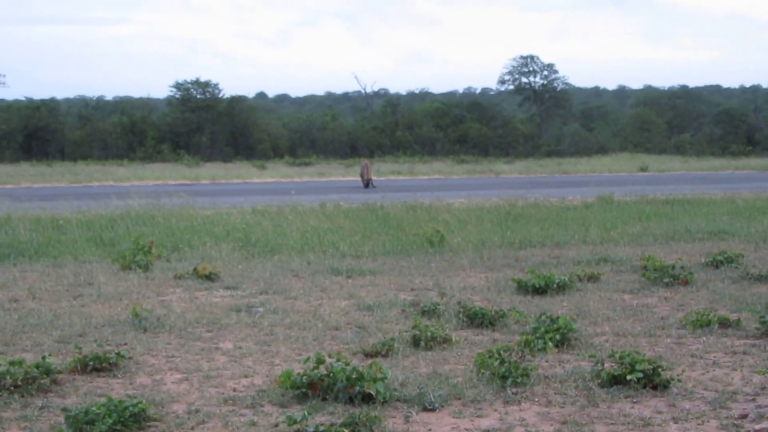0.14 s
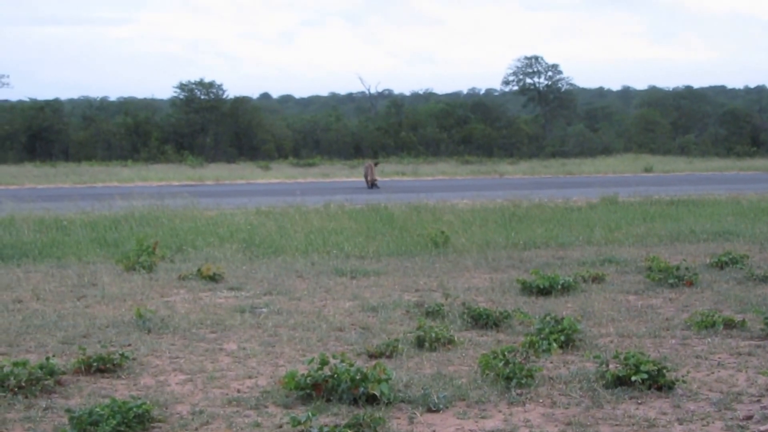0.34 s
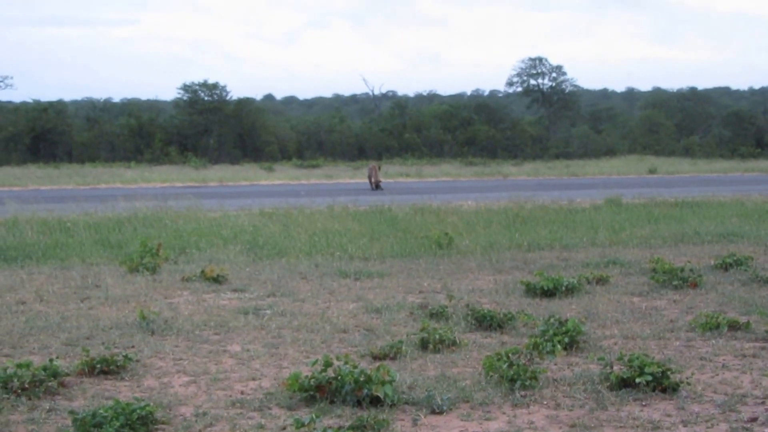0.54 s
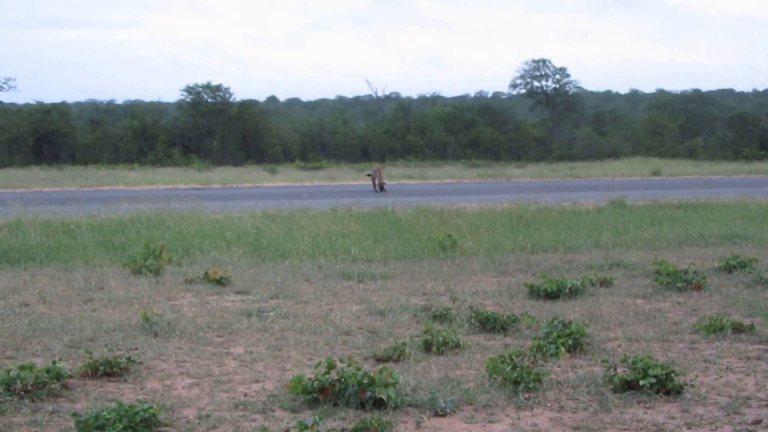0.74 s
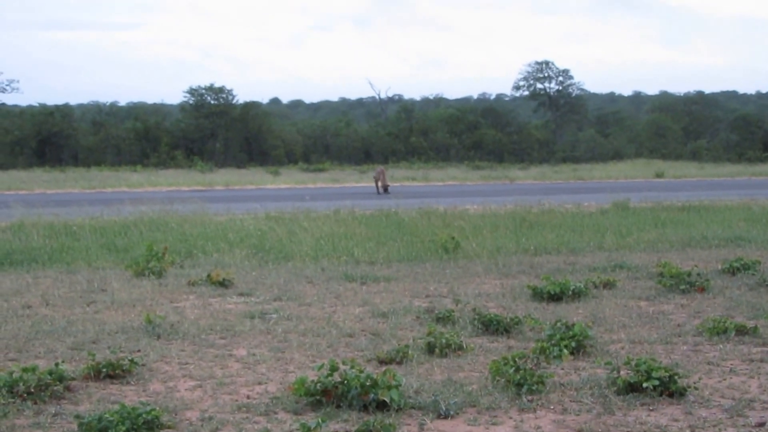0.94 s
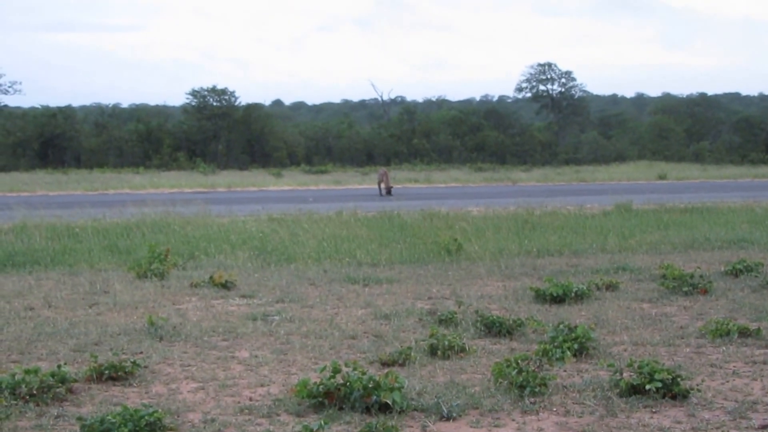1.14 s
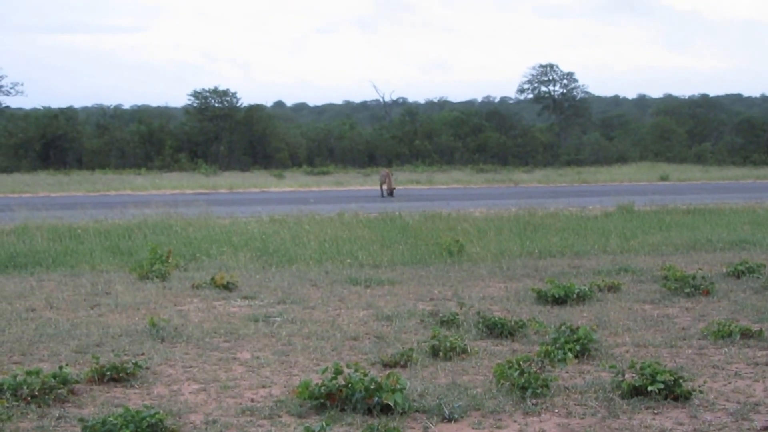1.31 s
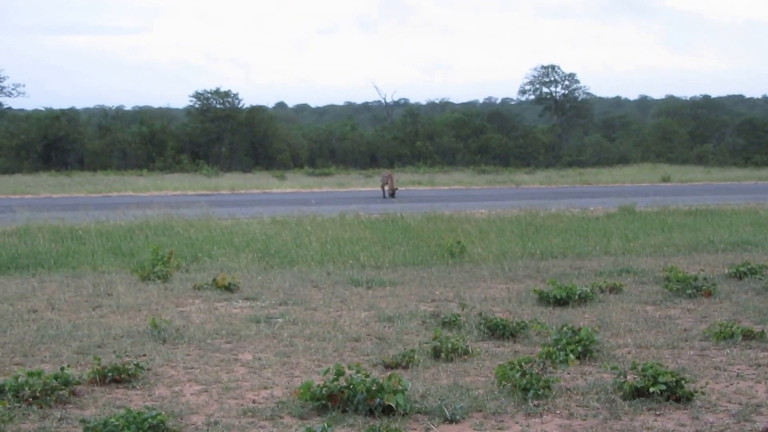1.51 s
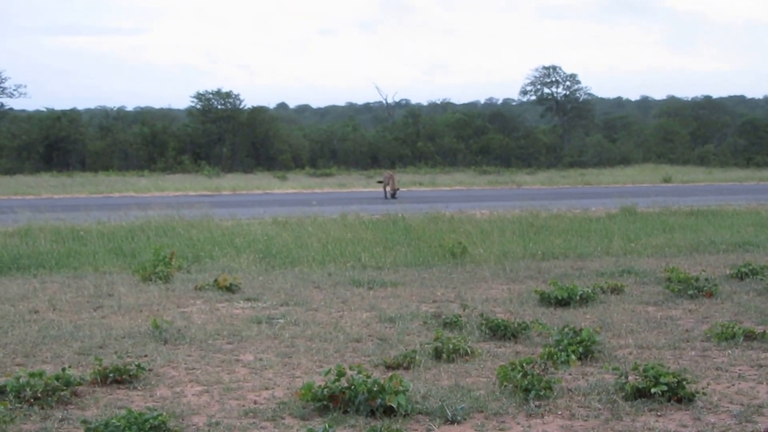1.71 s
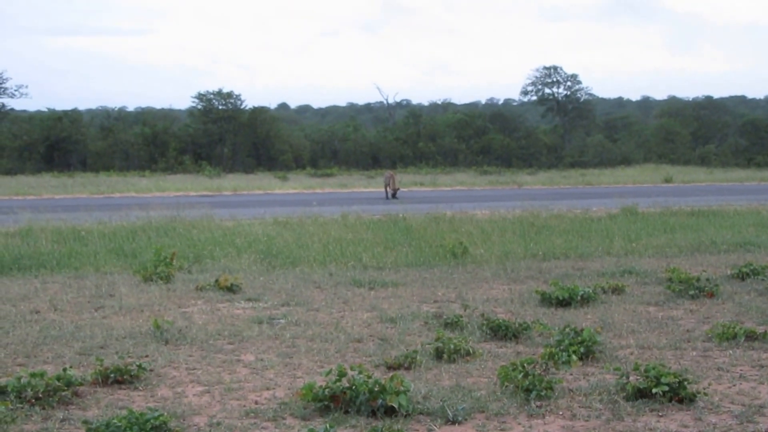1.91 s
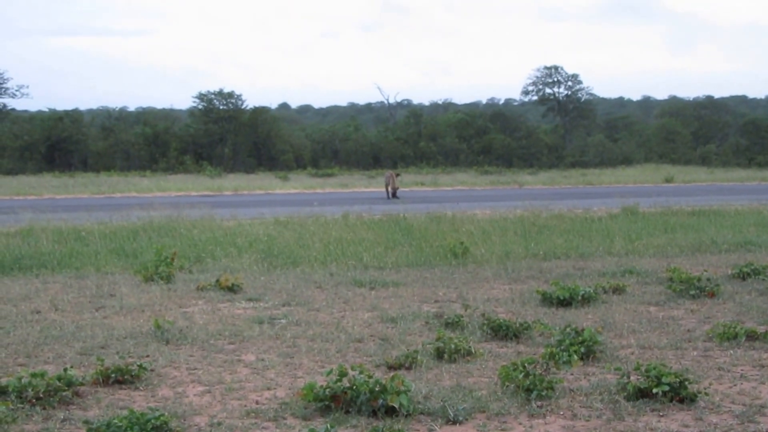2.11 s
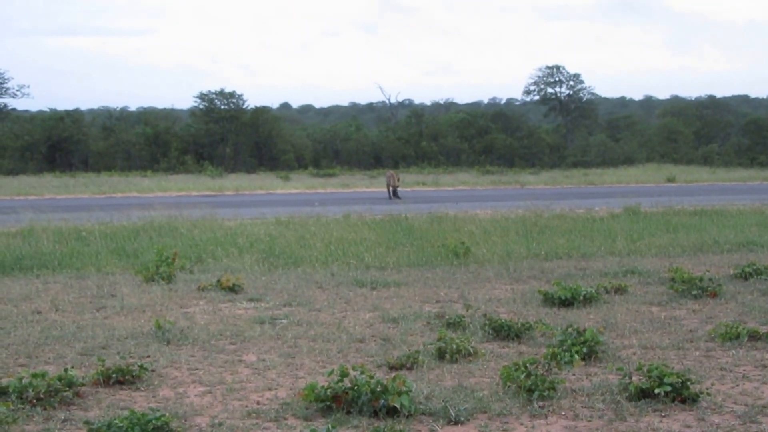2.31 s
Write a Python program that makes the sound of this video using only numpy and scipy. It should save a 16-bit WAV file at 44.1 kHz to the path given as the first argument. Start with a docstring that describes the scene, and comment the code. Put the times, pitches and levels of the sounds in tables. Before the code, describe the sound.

A single hyena whoop over open grassland: a smooth low moan rises, flips to a loud high arch, then drops roughly and fades; faint crickets and tiny bird notes, soft tree echo, clear mono pickup.

```python
"""A hyena whoops across open grassland: a clean moan glides up, breaks into a high arch and sinks back.
Overtones of one pitch and gated breath noise pass through resonances; a second, slower vibration of the
vocal folds adds sidebands that roughen parts of the call. Crickets chirp and a bird trills and peeps as
short drooping sines. Shaped noise makes a faint outdoor hush with one low throb, and the tree line
answers the calls as a decaying scatter of echoes."""
import sys
import numpy as np
from scipy import signal
from scipy.fft import rfft, irfft, next_fast_len
from scipy.io import wavfile
from scipy.ndimage import uniform_filter1d, map_coordinates

SR = 44100
rng = np.random.default_rng(int(sys.argv[2]) if len(sys.argv) > 2 else 0)


def file_out(sig):
    """Save sig as 16-bit WAV at sys.argv[1]."""
    # one column per channel
    cols = np.atleast_2d(sig).T
    # limit, then scale
    lim = np.clip(cols, -1, 1)
    pcm = np.round(lim * 32767).astype(np.int16)
    wavfile.write(sys.argv[1], SR, pcm)


N = 103635  # length in samples
TOP_HZ = 15100  # upper band limit

# Treble resonances that colour both overtones and breath: center_hz, width_hz, gain_db
TREBLE_RESONANCES = [(4190, 170, -1), (4728, 170, -5), (5250, 300, -7), (5660, 250, -3),
                     (7030, 1500, -14.5), (7950, 230, -11.5), (8600, 290, -14), (9600, 500, -21),
                     (10400, 920, -20), (11400, 790, -23.5)]


def hyena():
    """Source and filter: a periodic voice and pulsed breath noise, coloured by resonances."""
    # The call: time_s, pitch_hz, level_db of harmonics 1, 2, 3 and 4,
    # upper_db (harmonics from 5 up, before lift and resonances), breath_db (low breath)
    call = [(0.0, 255, -28, -22, -38, -49, -49, -39), (0.01, 243.4, -28, -37, -35.5, -49, -59.5, -50),
            (0.18, 256.8, -24.5, -37.5, -34, -45.5, -54, -51),
            (0.35, 281.5, -21.5, -44.5, -31.5, -42, -52, -45.5),
            (0.46, 301, -20, -35, -29, -39, -53.5, -43.5), (0.5, 308.4, -18.5, -30, -26.5, -49, -45.5, -36),
            (0.56, 345.4, -13, -21, -30, -26.5, -45.5, -37.5),
            (0.62, 379.3, -8.5, -23, -25.5, -38.5, -36, -42), (0.69, 399.8, -8, -25, -35.5, -34, -42, -46),
            (0.8, 432.5, -18, -25, -19, -31.5, -31, -44), (0.83, 446.6, -15, -25.5, -13, -22, -25, -44),
            (0.86, 464.7, -9.5, -25.5, -17, -25.5, -31.5, -41.5),
            (0.88, 536.6, -27, -15, -48, -52.5, -45.5, -48.5),
            (0.9, 580.6, -29.5, -21.5, -44, -32, -37, -48), (0.95, 661.5, -23, -11.5, -39, -42.5, -38, -49),
            (0.98, 734, -16, -12, -54, -50, -47.5, -49.5),
            (1.01, 769.6, -17.5, -11.5, -55.5, -50, -45, -51), (1.08, 818, -19, -16.5, -35, -51, -31, -52),
            (1.13, 796.7, -16.5, -12.5, -25.5, -42, -22.5, -48),
            (1.18, 714.3, -14, -18, -36, -65, -25, -50), (1.22, 660, -21, -15, -23.5, -37.5, -18, -46),
            (1.23, 636, -17.5, -17.5, -35.5, -41.5, -28.5, -54.5),
            (1.27, 571, -24, -24.5, -28.5, -32, -31, -52), (1.32, 469.8, -7, -25.5, -29, -27, -29, -39.5),
            (1.41, 434.6, -21, -28.5, -22.5, -30, -39.5, -43),
            (1.48, 408.7, -14, -22.5, -44, -48.5, -45, -40.5),
            (1.54, 386.4, -12.5, -24.5, -30, -43, -41, -43.5),
            (1.58, 349.8, -19, -25, -50, -39.5, -50, -35.5), (1.62, 321.7, -20, -36.5, -53, -61, -59, -36),
            (1.66, 280.0, -27.5, -46, -30.5, -38, -56, -34.5),
            (1.72, 272, -32, -49, -32, -70.5, -49.5, -37), (1.73, 266.4, -29, -38, -30, -38.5, -53, -40.5),
            (1.81, 261.4, -28, -40, -37.5, -49.5, -59, -43),
            (1.96, 248.8, -31, -42.5, -36, -45.5, -67.5, -49.5),
            (2.28, 234, -37, -41, -41.5, -48, -73, -60), (2.35, 232.5, -45, -54, -62, -62, -83, -55)]
    # Treble: time_s, overtone_db (before resonances and tilt), breath_db, hoarseness (pitch scatter, fraction)
    treble = [(0, -85, -77, .001), (.55, -79, -75, 0.0011), (.62, -72.5, -66.5, 0.0023),
              (.84, -65.5, -64.5, .002), (.88, -58, -63.5, 0.0025), (.93, -55, -62, .003),
              (.97, -48.5, -65, .002), (1.02, -52, -69.5, 0.00089), (1.09, -38, -69.5, .001),
              (1.14, -39, -62, 0.0034), (1.2, -41, -47.5, .012), (1.26, -49, -50.5, .02),
              (1.32, -56.5, -56, .02), (1.36, -63.5, -59.5, .01), (1.53, -68.5, -56.5, 0.0082),
              (1.62, -76, -71.5, 0.0024), (1.8, -89, -67, .002), (2.35, -93, -68, 0.0016)]
    glide_s = 0.024  # moving average that rounds every turn of the voice
    jitter, shimmer_db = 0.0016, 0.43  # random pitch (fraction) and level

    smooth_call = uniform_filter1d(curves(call), int(glide_s * SR), axis=1)
    pitch, *low_db, upper_db, breath_db = smooth_call
    bright_db, treble_breath_db, hoarse = curves(treble)
    pitch = pitch * (1 + jitter * wobble(59.63))
    turn = phase(pitch)

    overtones = upper_overtones(pitch, turn, upper_db, bright_db, hoarse)
    for k, db in enumerate(low_db[1:], 2):
        overtones += amp(db) * np.sin(k * turn + k * k / 3)
    fundamental = amp(low_db[0]) * np.sin(turn)
    voice = fundamental + flutter() * overtones + second_vibration(pitch, turn)
    voice *= np.sqrt(2)  # a lone sine then has its level as rms

    low_breath, treble_breath = breath(turn)
    shimmer = amp(shimmer_db * wobble(48.14))
    return shimmer * voice + amp(breath_db) * low_breath + amp(treble_breath_db) * treble_breath


def upper_overtones(pitch, turn, upper_db, bright_db, hoarse):
    """Harmonic series from the fifth up: throat resonances below, hoarse treble resonances above."""
    treble_from_hz = 3720
    lift_db, upper_slope_db, bright_slope_db = 20, 1, -5  # slopes per octave
    scatter_db, scatter_rate = 4.5, 51  # each treble overtone wavers on its own; knots per second
    total = np.zeros(N)
    for k in range(5, 30):
        hz = k * pitch
        high = 1 / (1 + np.exp((treble_from_hz - hz) / 60))  # crossfade to the treble
        throaty = amp(upper_db + lift_db) * throat(hz)
        throaty *= slope(upper_slope_db, hz, treble_from_hz / 2)
        bright = amp(bright_db + scatter_db * wobble(scatter_rate))
        bright *= peaks(TREBLE_RESONANCES, hz) * slope(bright_slope_db, hz, treble_from_hz)
        gain = (1 - high) * throaty + high * bright
        blur = phase(hz * hoarse * wobble(250))  # hoarseness as frequency modulation
        total += gain * (hz < TOP_HZ) * np.sin(k * turn + blur + k * k / 3)
    return total


def second_vibration(pitch, turn):
    """Biphonation: a second fold frequency makes sum and difference tones around each harmonic."""
    # time_s, ratio (rate over pitch), level_db of the sidebands,
    # rising_db (sum tones relative to difference tones)
    second_rows = [(0, 0.44, -50, -1), (.15, .45, -69, 4), (.35, 0.43, -44.5, -8), (.53, 0.49, -31, -9.5),
                   (.6, 0.44, -39, -7.5), (.84, 0.45, -35.5, -0.5), (.88, .43, -68, -7),
                   (1.29, .43, -76, -12.5), (1.33, 0.43, -23.5, -8.5), (1.45, 0.43, -31, -3.5),
                   (1.56, 0.39, -34, -10.5), (1.6, .47, -28, 1), (1.64, 0.56, -32, -24),
                   (1.67, .499, -31.5, -23), (1.73, .499, -28.5, -27.5), (1.79, .499, -36, -38),
                   (1.83, 0.52, -55, -30), (1.95, .499, -69, -16), (2.35, .499, -87, -18)]
    wander = 0.0042  # random drift of the ratio
    side_slope_db = 1  # per doubling of k + 1
    rasp_db, rasp_rate = 4, 70.25  # each sideband wavers on its own; knots per second

    ratio, side_db, rising_db = curves(second_rows)
    unlocked = (10 * np.abs(1 - 2 * ratio)).clip(0, 1)  # no rasp while the ratio is one half
    second = pitch * (ratio + wander * wobble(40))
    second_turn = phase(second)
    sides = np.zeros(N)
    for k in range(11):
        for j in (-1, 1):
            if k == 0 and j == -1:  # a negative frequency
                continue
            rasp = rasp_db * unlocked * wobble(rasp_rate)
            db = rising_db * (j > 0) + side_slope_db * np.log2(k + 1) + rasp
            gain = throat(k * pitch + j * second) * amp(db)
            sides += gain * np.sin(k * turn + j * second_turn + k * k / 3)
    return amp(side_db) * sides


def flutter():
    """Amplitude modulation of the overtones for a moment, as the arch falls."""
    center_s, half_s, rate_hz, depth = 1.197, 0.036, 88.4, 0.54
    t = np.arange(N) / SR
    beat = np.sin(2 * np.pi * rate_hz * t + 2.9 * wobble(35))
    return 1 + depth * np.exp(-((t - center_s) / half_s) ** 4) * beat


def breath(turn):
    """Turbulence noise pulsed once per pitch cycle, low through the throat and high in the treble."""
    slope_db = 2  # per octave

    def low_response(hz):
        low_cut = 1 / (1 + (250 / (hz + 1)) ** 4)
        return throat(hz) * slope(slope_db, hz, 700) * low_cut

    gated = rng.standard_normal((2, N)) * (1 + 0.32 * np.cos(turn))
    low = unit(filtered(gated[0], low_response))
    high = unit(filtered(gated[1], lambda hz: peaks(TREBLE_RESONANCES, hz)))
    return low, high


def throat(hz):
    """Transfer function of the vocal tract: resonances multiplied by a cancellation."""
    # Resonances of the throat: center_hz, width_hz, gain_db
    resonances = [(401.5, 83, 8.5), (778, 274, -4.5), (1010, 520, -15), (1350, 173, -4.5), (1696, 290, -18),
                  (1970, 180, -20.5), (2256, 250, -26.5), (3296, 120, -44)]
    # Cancellations: center_hz, half_width_hz (Gaussian, to 1/e), gain_db
    cancellations = [(3820, 380, -12)]
    grid = np.arange(1., SR, 4)
    dip_db = sum(db * np.exp(-((grid - c) / w) ** 2) for c, w, db in cancellations)
    return np.interp(hz, grid, peaks(resonances, grid) * amp(dip_db))


def crickets():
    """Pulsed tones: short drooping sines, mostly in groups of three."""
    # Pulses: time_s (each starts 3 ms earlier), peak_db
    pulses = [(0.0767, -56), (0.1084, -61), (0.1401, -56), (0.3965, -55), (0.4279, -53), (0.4594, -54),
              (0.6828, -52), (0.7148, -53), (0.7497, -52), (1.4616, -55), (1.4914, -55), (1.5259, -54),
              (1.737, -57), (1.7679, -58), (1.7993, -54), (2.0213, -58), (2.0532, -59), (2.0847, -59),
              (2.2932, -54), (2.3246, -56)]
    start_hz, length_s, fall_hz = 5350, .018, 500
    out = np.zeros(N + SR)
    for s, db in pulses:
        add_note(out, s - .003, db, start_hz, length_s, fall_hz)
    return out[:N]


def bird():
    """Frequency-swept notes: a trill of ten scattered note pairs, and two peeps."""
    # Peeps: start_s, peak_db, start_pitch_hz, length_s
    peeps = [(2.132, -51, 2296, .018), (2.308, -54, 1991, 0.027)]
    trill_from_s, step_s, note_s = 1.762, .0192, .015
    trill_hz, twin_below_hz, fall_hz = 5000, 326.8, 500  # each note has a lower twin
    trill_db = -58.5
    out = np.zeros(N + SR)
    for k, (db_draw, hz_draw) in enumerate(rng.standard_normal((20, 2))):
        start_s = trill_from_s + k // 2 * step_s
        hz = trill_hz - k % 2 * twin_below_hz + 90 * hz_draw
        add_note(out, start_s, trill_db + 1.6 * db_draw, hz, note_s, fall_hz)
    for s, db, hz, length_s in peeps:
        add_note(out, s, db, hz, length_s, 30)
    return out[:N]


def add_note(out, s, db, hz, length_s, fall_hz):
    """Phase is the integral of frequency: a soft sine whose pitch droops towards its end."""
    u = np.arange(int(length_s * SR)) / (length_s * SR)
    swell = np.sin(np.pi * u ** .8)
    note = amp(db) * swell * np.sin(phase(hz - fall_hz * u ** 2.5))
    out[round(s * SR):][:len(u)] += note


def trees(x):
    """Diffuse reverberation: convolution with noise whose every frequency dies at its own speed."""
    # Decay of the answer: frequency_hz, t60_s
    decay = [(200, 0.25), (1500, 0.94), (6000, 0.51)]
    delay_s = .02
    hz, t, z = signal.stft(rng.standard_normal(SR // 2), SR, nperseg=256)
    fade = amp(-60 * t / along(decay, hz)[:, None])
    tail = signal.istft(z * fade, SR, nperseg=256)[1]
    delayed = np.pad(x, (int(delay_s * SR), 0))
    return signal.fftconvolve(delayed, tail / np.linalg.norm(tail))[:N]


def air():
    """Filtered random noise: a hush that drifts a little, and a low throb under the call."""
    # Spectrum of the hush: frequency_hz, relative_db (per Hz)
    hush_spectrum = [(20, -1), (60, 0), (110, 3.5), (200, 5.5), (600, 3), (1500, -2), (3000, -7),
                     (3800, -19), (5000, -13.5), (9000, -18), (13000, -25), (14300, -35.5), (15100, -51)]
    # Spectrum of the throb: frequency_hz, relative_db (per Hz)
    throb_spectrum = [(60, -27), (95, 25), (112, 36), (135, 12), (200, -32.5)]
    # Throb: center_s, half_width_s (Gaussian, to 1/e), peak_db (rms)
    throbs = [(1.66, 0.076, -40.5)]
    hush_db, drift_db = -50.5, .8

    t = np.arange(N) / SR
    swell = sum(amp(db) * np.exp(-((t - s) / w) ** 2) for s, w, db in throbs)
    hush_gain = amp(hush_db + drift_db * wobble(2.5))
    return hush_gain * shaped_noise(hush_spectrum) + swell * shaped_noise(throb_spectrum)


def shaped_noise(points):
    """Spectral shaping: white noise through a response, scaled to rms 1."""
    return unit(filtered(rng.standard_normal(N), lambda hz: amp(along(points, hz))))


def peaks(rows, hz):
    """Resonance: the powers of steep peaks add; each width lies between half-amplitude points."""
    power = sum(amp(2 * db) / (1 + (2 * (hz - c) / w) ** 2) ** 1.989 for c, w, db in rows)
    return np.sqrt(power)


def slope(db, hz, from_hz):
    """Spectral tilt in dB per octave, as a gain."""
    return amp(db * np.log2(hz / from_hz + 1e-3))


def filtered(x, response):
    """Linear filtering: the spectrum of x times a response of frequency."""
    m = next_fast_len(N + SR // 2)
    return irfft(rfft(x, m) * response(np.fft.rfftfreq(m, 1 / SR)), m)[..., :N]


def phase(hz):
    """Phase in radians, the running integral of frequency."""
    return 2 * np.pi * np.cumsum(hz) / SR


def wobble(rate):
    """Band-limited randomness: a smooth curve through random knots, rate of them a second."""
    knots = rng.standard_normal(int(N * rate / SR) + 4)
    return map_coordinates(knots, [np.arange(N) * rate / SR])


def curves(rows):
    """Linear interpolation: one value per sample for each column after the time."""
    s, *cols = np.transpose(rows)
    return [np.interp(np.arange(N) / SR, s, c) for c in cols]


def along(points, hz):
    """Interpolation of (Hz, value) points on a logarithmic frequency axis."""
    f, v = np.transpose(points)
    return np.interp(np.log(hz + 1), np.log(f + 1), v)


def amp(db):
    """Decibels to amplitude gain."""
    return 10 ** (np.asarray(db) / 20)


def unit(x):
    """Normalisation to rms 1."""
    return x / np.sqrt(np.mean(x ** 2) + 1e-20)


def scene():
    """Superposition: the calls, their answer from the trees, and the air."""
    trees_db = -19.5
    near = hyena() + crickets() + bird()
    return (near + amp(trees_db) * trees(near) + air())[None]


def record(dry):
    """Soft saturation rounds off the highest peaks; a band limit removes everything above it."""
    ceiling = .8
    soft = dry / (1 + np.abs(dry / ceiling) ** 5) ** (1 / 5)
    return filtered(soft, lambda hz: hz < TOP_HZ)


dry = scene()
out = record(dry)
file_out(out)
```